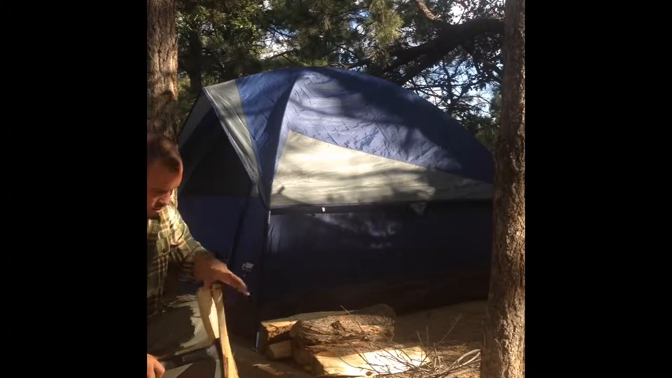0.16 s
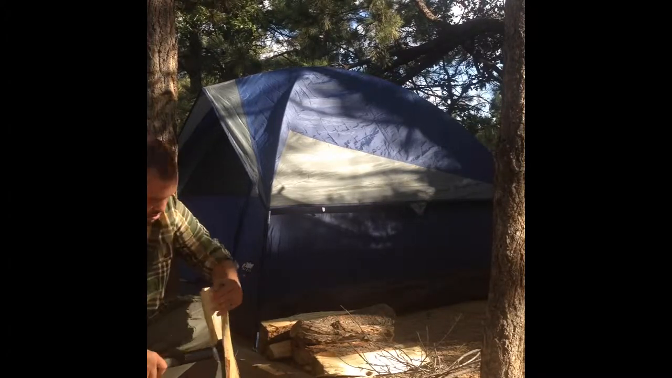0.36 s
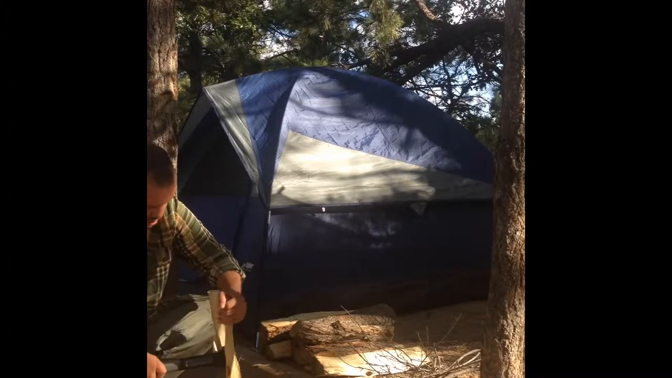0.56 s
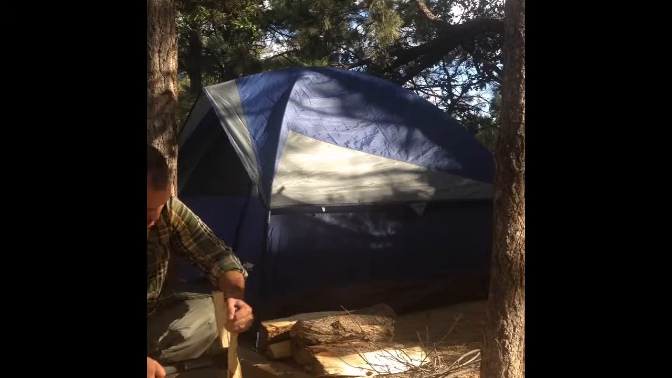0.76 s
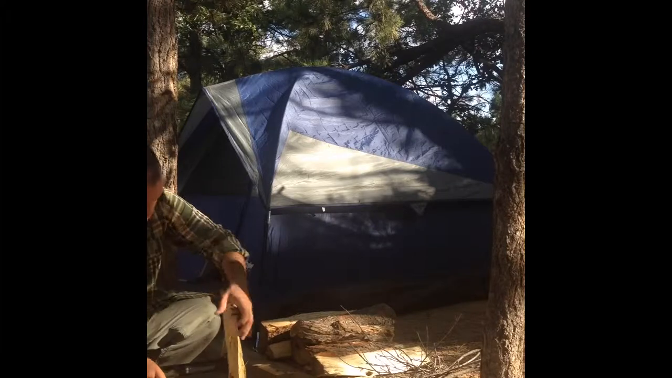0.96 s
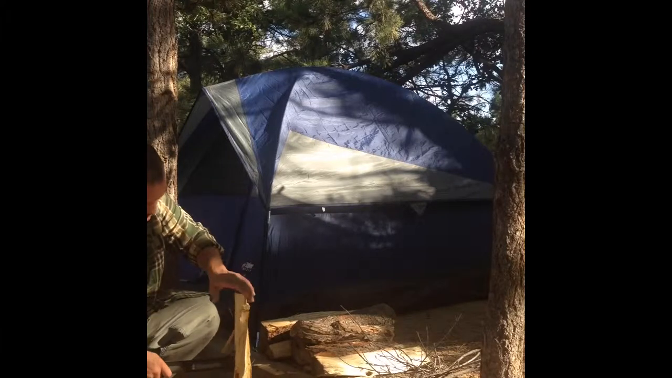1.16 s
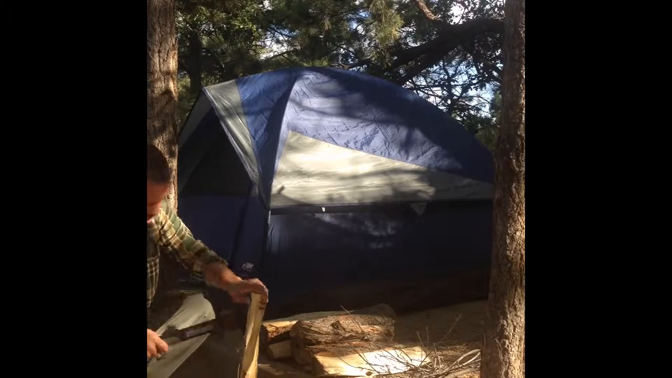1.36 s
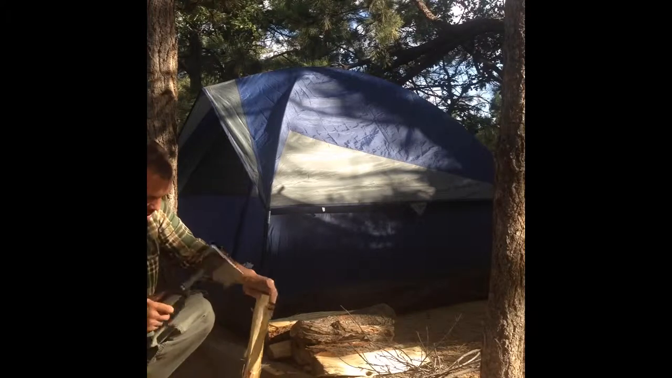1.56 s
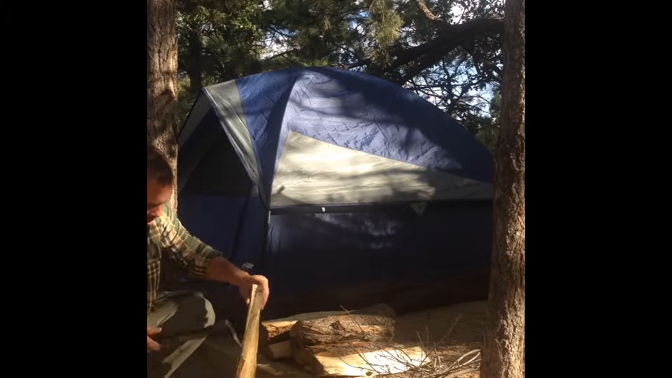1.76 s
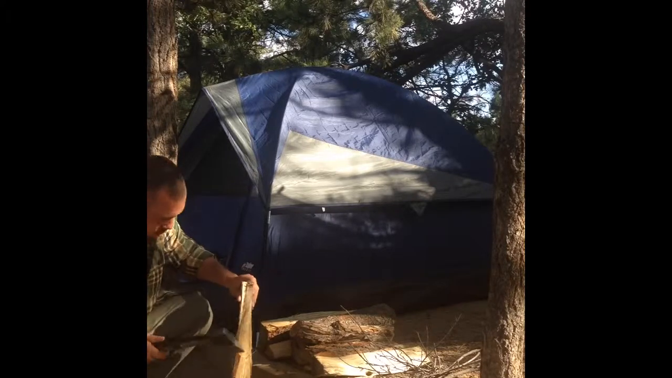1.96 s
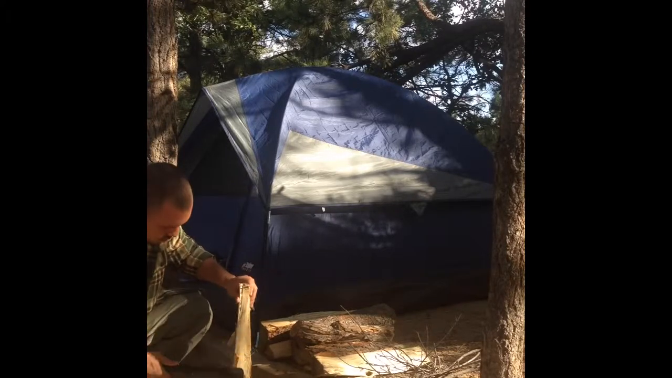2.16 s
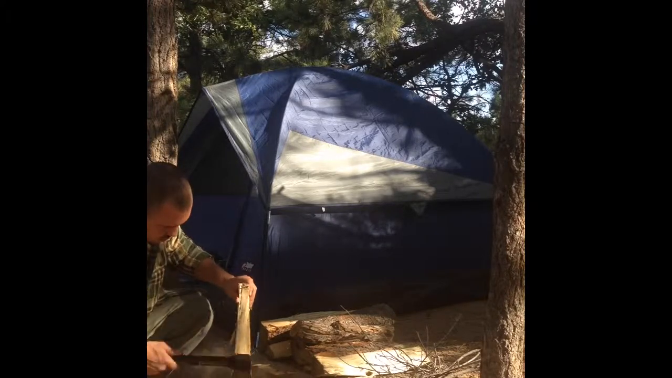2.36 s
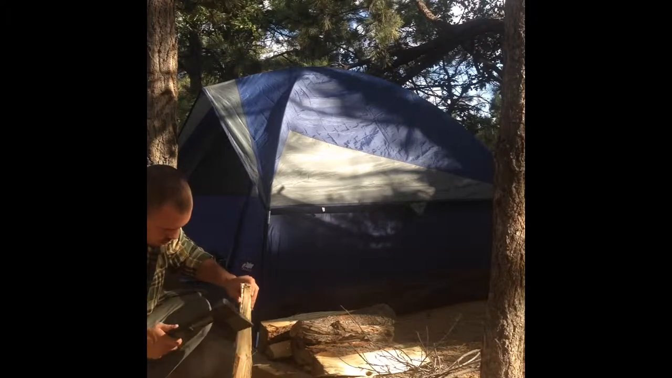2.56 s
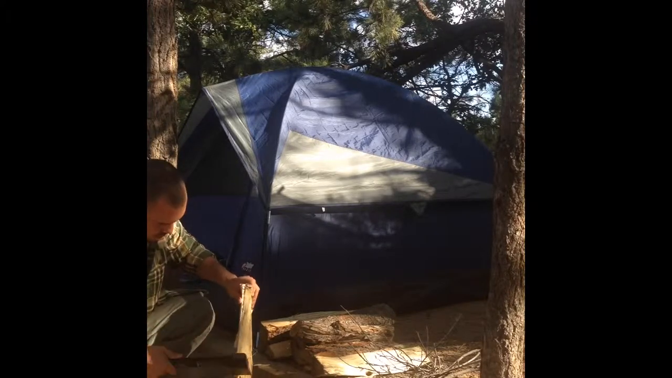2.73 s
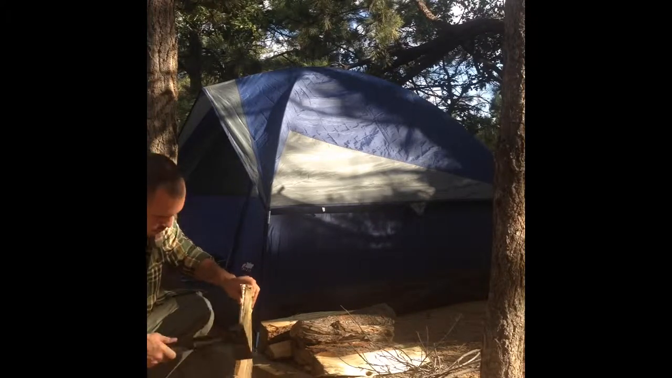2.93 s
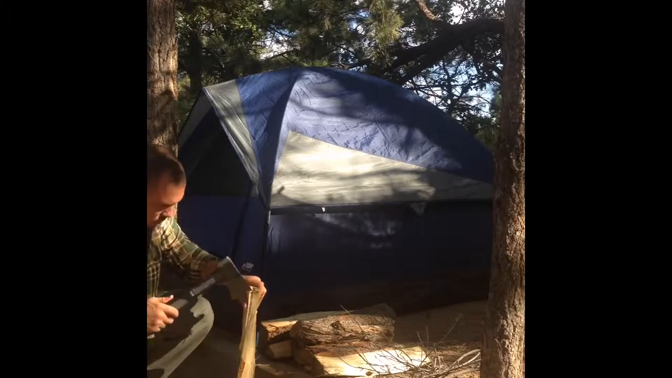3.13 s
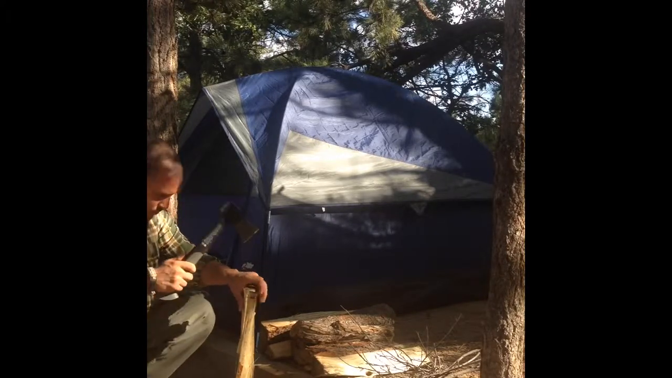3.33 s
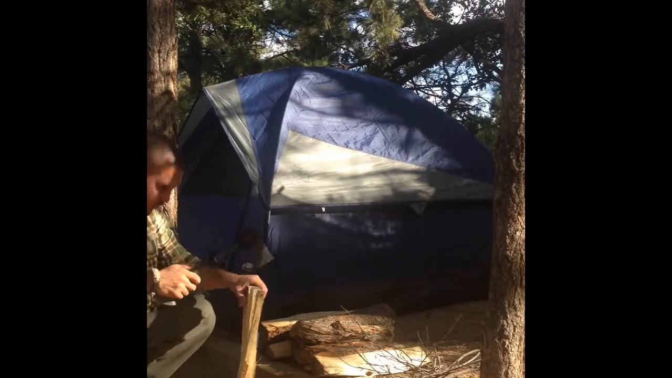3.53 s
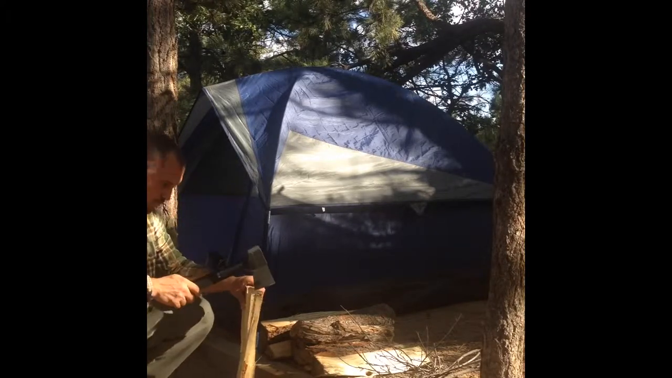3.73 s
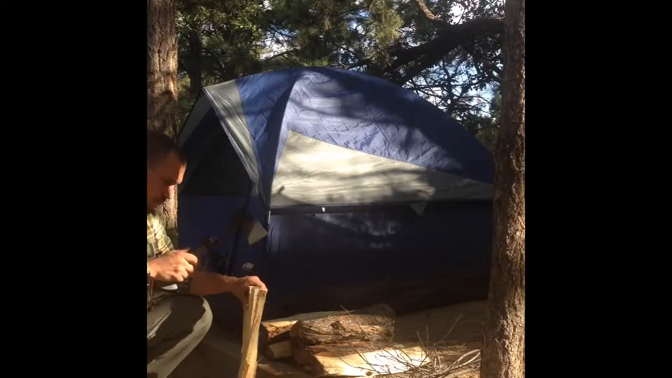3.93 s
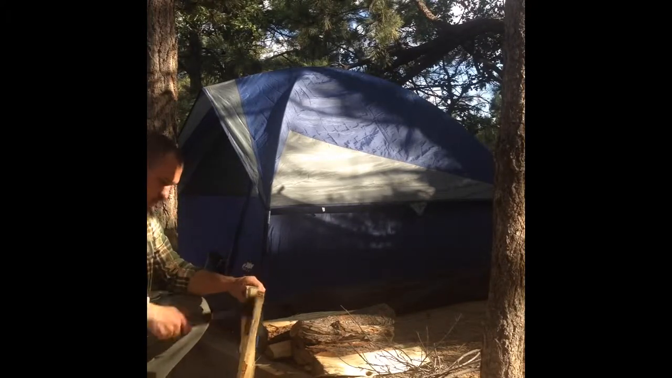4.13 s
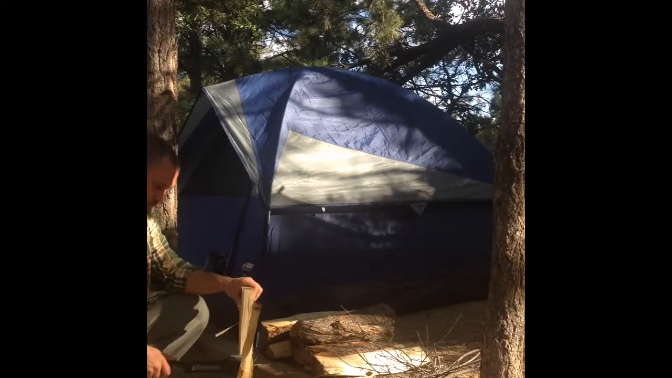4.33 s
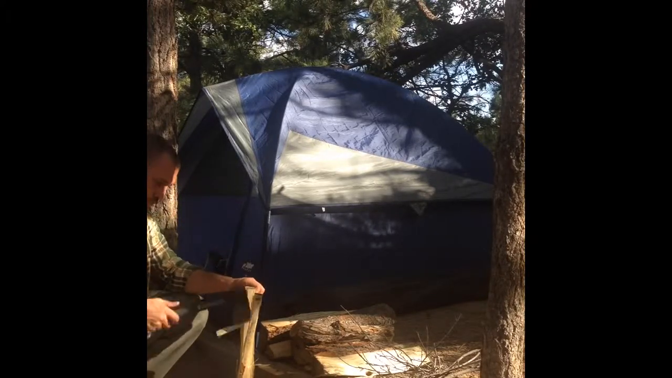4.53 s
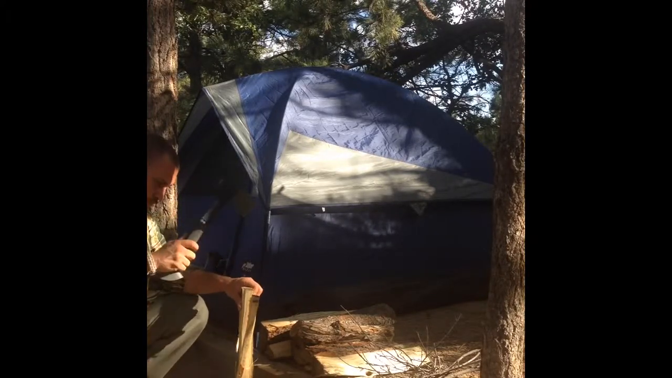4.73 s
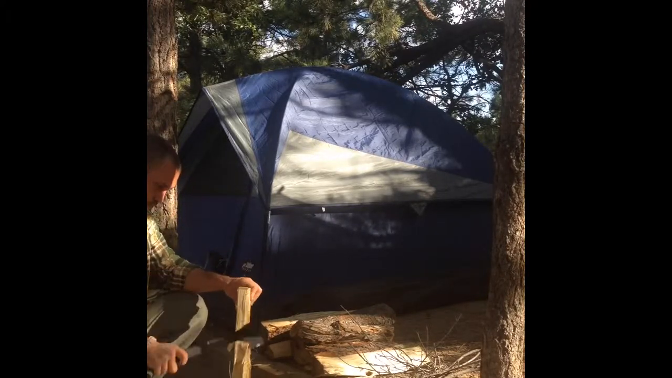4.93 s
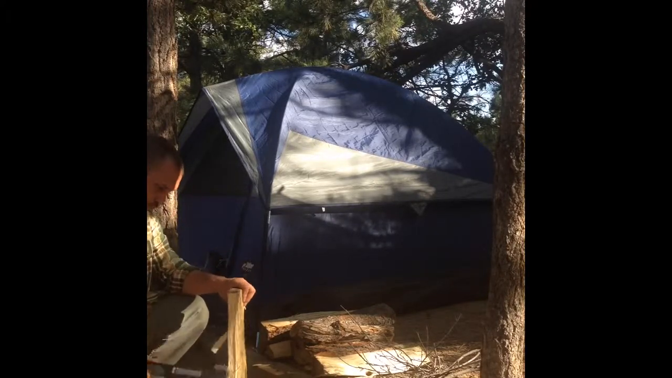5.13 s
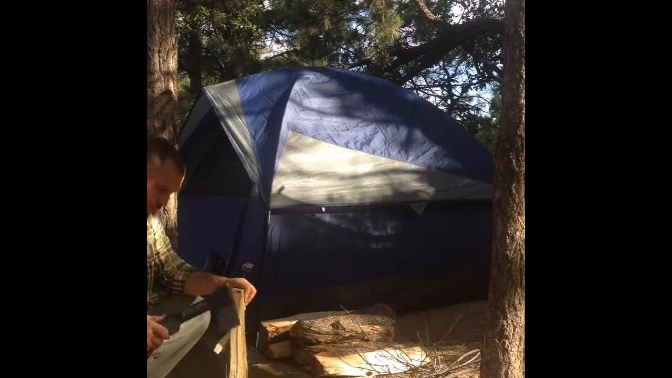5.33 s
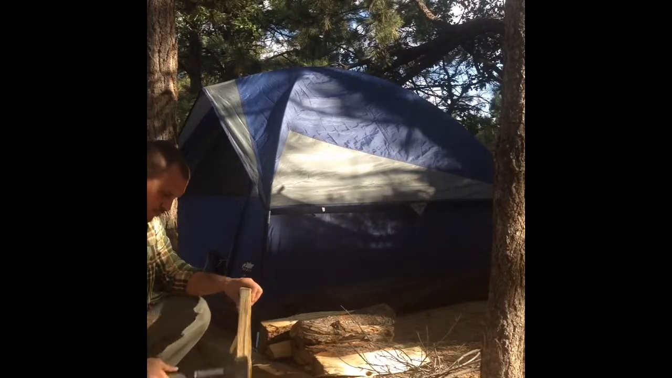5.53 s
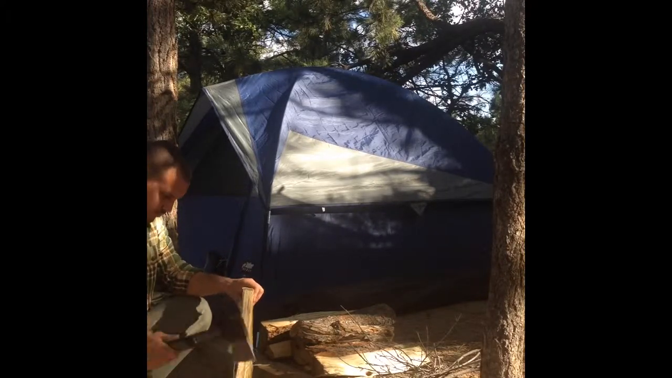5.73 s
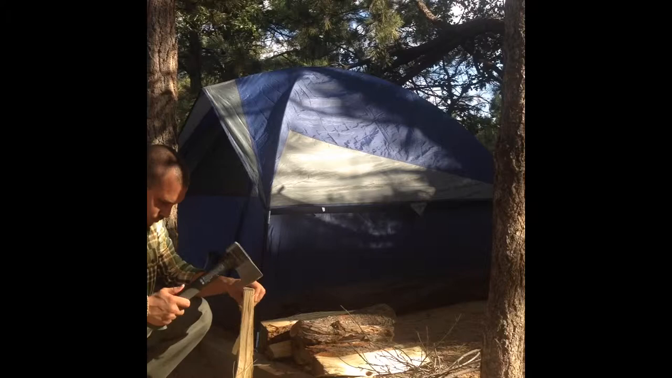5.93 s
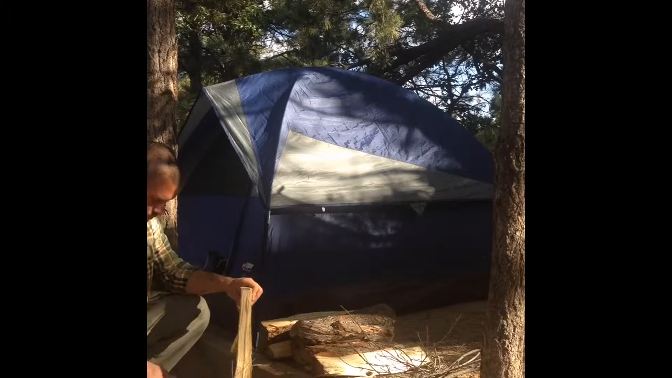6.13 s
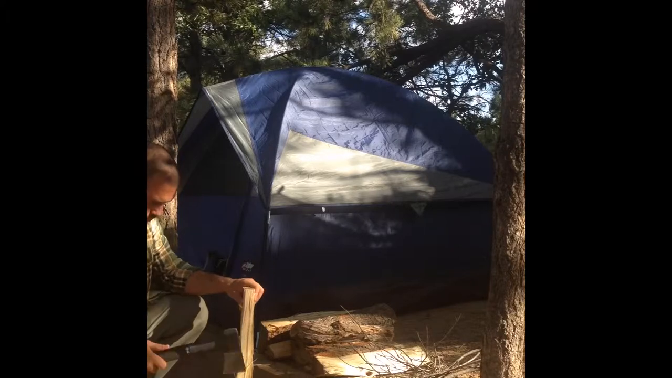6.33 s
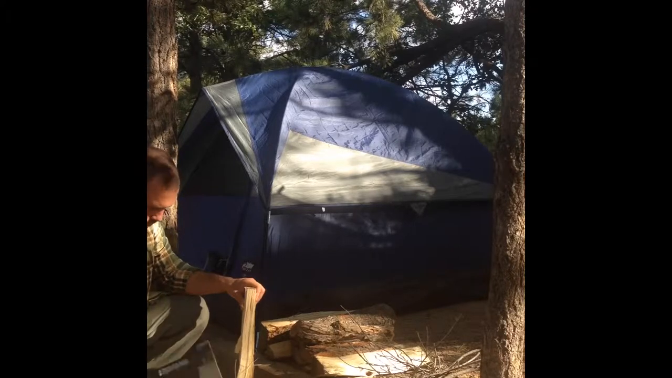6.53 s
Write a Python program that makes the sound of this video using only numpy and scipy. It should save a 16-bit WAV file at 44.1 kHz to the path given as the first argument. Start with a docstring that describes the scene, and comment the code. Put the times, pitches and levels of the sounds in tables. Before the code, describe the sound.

Quiet handling ticks come first, then two loud chops close together, a pause, and further splitting blows of varied strength. Each is a bright fibrous snap with a short hollow knock and ground thump, some trailed by crackling. Far traffic, faint motor hum and low wind sit well below. Close mono pickup in an open wooded camp, slightly overloaded on the hardest crack.

```python
"""Chopping firewood in a forest camp

A hatchet thuds into a stick of firewood: short noise bursts ring the dry fibres as snaps, ticks and
crackle, and decaying sines are the stick hitting the ground. Fading noise is the wash from the trees.
Shaped noise makes the far road, the hiss and a gust. Stacks of gliding sines make two engines revving
past, and sines of fixed pitch make the hum of a generator."""
import sys
import numpy as np
from scipy import signal
from scipy.io import wavfile
from scipy.ndimage import uniform_filter1d

SR = 44100
rng = np.random.default_rng(int(sys.argv[2]) if len(sys.argv) > 2 else 0)


def how_loud(loudness_db):
    """Turn decibels into a plain amplitude multiplier (0 dB gives 1, 20 dB gives 10)."""
    steps = np.asarray(loudness_db, float) / 20
    return 10 ** steps


def dump(signal):
    """Clip the signal to [-1, 1] and save it as 16-bit WAV at the path in sys.argv[1]."""
    limited = np.clip(np.atleast_2d(signal).T, -1, 1)
    pcm = np.round(limited * 32767).astype(np.int16)
    wavfile.write(sys.argv[1], SR, pcm)


N = 295024  # length in samples


def add(mix, start_s, sound):
    """Mixes a sound in at a time, cutting it off at the end of the mix."""
    part = mix[round(start_s * SR):][:len(sound)]
    part += sound[:len(part)]


def read(points, hz):
    """Reads a table between its points, along a log-frequency axis."""
    f, value = np.transpose(points)
    return np.interp(np.log(hz + 1), np.log(f + 1), value)


def peaked(x):
    """Scales to a peak of one."""
    return x / np.max(np.abs(x))


# far road and microphone hiss, relative spectrum: (f/Hz, level/dB per Hz)
ROAD_SPECTRUM = [(15, -47), (28, -31.5), (40, -16), (55, 1.5), (97, 2), (157, -2.5), (250, -6), (344, -9),
                 (463, -11.5), (700, -7), (961, -8), (1400, -13), (1900, -23), (2540, -28), (3400, -27),
                 (5000, -29.5), (14700, -31.5), (16000, -39.5)]
# a gust on the microphone in the deep bass: (loudest t/s, half length t/s, calm level/dB, added gust level/dB)
GUST = (5.5, 1.2, -2.5, 8)


def road(patchy_db=1.0, lumpy_db=1.5):
    """Noise built from random short-time spectra in drifting patches; the bass is lumpier than the hiss."""
    rms_db, traffic_lift_db = -50.5, 1.65
    size, hop = 2048, 512
    frames, hz = N // hop + 5, np.fft.rfftfreq(size, 1 / SR)
    real, imaginary, patches = rng.standard_normal((frames, len(hz), 3)).T
    patches = uniform_filter1d(patches, size=9, axis=0)
    patches = uniform_filter1d(patches, size=9, axis=1)
    depth_db = np.where(hz < 300, lumpy_db, patchy_db * (hz < 5000))[:, None]
    patch_db = depth_db * patches / patches.std()

    loudest_s, half_s, calm_db, gust_db = GUST
    t = np.arange(frames) * hop / SR
    breeze_db = calm_db + gust_db / (1 + ((t - loudest_s) / half_s) ** 2)
    deep_bass = np.clip(2 - hz / 60, 0, 1)[:, None]  # full up to 60 Hz, none above 120 Hz
    swell_db = traffic_lift_db * (hz < 5000)[:, None] + breeze_db * deep_bass

    spectra = (real + 1j * imaginary) * how_loud(read(ROAD_SPECTRUM, hz)[:, None] + patch_db + swell_db)
    wash = signal.istft(spectra, nperseg=size, noverlap=size - hop)[1][:N]
    return how_loud(rms_db) * wash / wash.std()


def engine(hz, orders, levels_db, waver_db):
    """Sines on multiples of a turning speed, wavering in level and phase as the air carries them."""
    t, turns = np.arange(N) / SR, np.cumsum(hz) / SR
    air = rng.standard_normal((N // 1024 + 2, len(orders)))
    air = uniform_filter1d(air, size=5, axis=0).T
    out = np.zeros(N)
    for order, level_db, drift in zip(orders, levels_db, air):
        drift = np.interp(t, np.arange(len(drift)) * 1024 / SR, drift / drift.std())
        phase = 2 * np.pi * (order * turns + rng.random()) + 0.25 * drift
        out += how_loud(level_db + waver_db * drift) * np.sin(phase)
    return np.sqrt(2) * out  # makes the levels rms


def passing(rows):
    """Speed and level along a pass; beyond its ends the engine fades by 300 dB per second."""
    s, hz, db = np.transpose(rows)
    t = np.arange(N) / SR
    outside_s = np.maximum(0, np.maximum(s[0] - t, t - s[-1]))
    return np.interp(t, s, hz), np.interp(t, s, db) - 300 * outside_s


# each hum order swells once and fades, a row per order:
# (loudest t/s, level/dB, fade/dB per s to either side)
HUM_SWELLS = [(5.6, -55, 6.5), (6.95, -55.5, 2), (3, -62, 2.3), (6.7, -62.5, 1.5), (3.9, -60, 7),
              (0.19, -64.5, 3), (7.2, -65, 1.5)]
# which multiples of the shaft speed are heard
HUM_MULTIPLES = (2, 4, 5, 6, 7, 8, 12)


def generator_hum():
    """A shaft turning at one speed hums on its multiples, each rising and falling in level."""
    shaft_hz, t = 46.45, np.arange(N) / SR
    levels_db = [top_db - fade_db * abs(t - s) for s, top_db, fade_db in HUM_SWELLS]
    return engine(np.full(N, shaft_hz), HUM_MULTIPLES, levels_db, waver_db=0.85)


# a second engine, one order heard above the road: (t/s, f/Hz, level/dB)
DRONE_PASS = [(4.35, 167, -58), (4.5, 155.6, -63), (4.7, 156.4, -56), (5, 170, -55.5), (5.38, 171, -58.5),
              (5.55, 161, -56.5), (5.75, 154, -67)]


def passing_drone():
    """One wavering sine follows the speed of the second engine."""
    hz, db = passing(DRONE_PASS)
    return engine(hz, [1], [db], waver_db=3.0)


# an engine revs and drops: (t/s, firing f/Hz, level/dB before the exhaust pipe)
REV_PASS = [(0.0, 80.5, -63), (0.3, 76.33, -62), (0.42, 76.03, -50.5), (0.56, 82.84, -46), (0.7, 86.2, -46),
            (0.82, 87.1, -46.5), (1.01, 86.3, -44), (1.21, 78, -49), (1.4, 70.06, -49.5),
            (1.63, 65.6, -47.5), (1.74, 61.35, -49), (1.99, 56.4, -56), (2.15, 57.56, -70)]
# the exhaust pipe colours each order as it glides through: (f/Hz, level/dB)
EXHAUST_PIPE = [(55, -6.5), (85, -7.5), (125, -3), (150, -2), (182, 0), (205, -12), (250, -19), (350, -24)]


def revving_engine():
    """The firing note and its next three multiples glide together through the exhaust pipe's response."""
    hz, db = passing(REV_PASS)
    orders = range(1, 5)
    levels_db = [db + read(EXHAUST_PIPE, order * hz) for order in orders]
    return engine(hz, orders, levels_db, waver_db=0.94)


# how fast the wash from the trees dies: (f/Hz, time to fall 60 dB t/s)
TREE_DECAY = [(250, 0.16), (700, 0.1), (1800, 0.1), (4500, 0.085), (7000, 0.096), (11000, 0.076)]


def trees(wood):
    """Scattered echoes from trunks and tent: noise whose bands each die at their own speed."""
    wash_db = -14
    far_t60_s, far_db = 0.59, -28.5  # the far edge of the clearing answers longer, below 6 kHz
    hz, t, spectra = signal.stft(rng.standard_normal(SR // 2), SR, nperseg=128)
    near = how_loud(-60 * t / read(TREE_DECAY, hz)[:, None])
    far = how_loud(far_db - 60 * t / far_t60_s) * (hz < 6000)[:, None]
    tail = signal.istft(spectra * (near + far), SR, nperseg=128)[1]
    # soft start: the nearest trunk is a metre or two away
    tail *= 1 - np.exp(-(np.arange(len(tail)) / SR / 0.0013) ** 2)
    return how_loud(wash_db) * signal.fftconvolve(wood, tail / np.linalg.norm(tail))[:N]


def mode(x, hz, width_hz):
    """A two-pole resonance of gain one at its centre."""
    radius = np.exp(-np.pi * width_hz / SR)
    angle = 2 * np.pi * min(hz, SR / 2.2) / SR
    return signal.lfilter([1 - radius, 0, radius - 1], [1, -2 * radius * np.cos(angle), radius ** 2], x)


# dry fibres ring with, before pitch and brightness: (f/Hz, width of one pass f/Hz, level/dB)
FIBRE_MODES = [(1191, 600, 0.5), (2136, 1200, 0.5), (2740, 1500, 7.5), (3280, 2600, -1.5), (4398, 1400, -1),
               (5700, 1680, -17.5), (7140, 2170, -20.5), (9400, 3000, -48.5), (12400, 2840, -50)]


def ring(breaks, pitch, bright_db, envelope=1):
    """The dry wood: every resonance applied twice for dark valleys; treble dies out of a burst first."""
    out = 0
    for k, (hz, width_hz, db) in enumerate(FIBRE_MODES):
        drive = breaks * envelope ** ((hz / 2750) ** 0.41)
        level_db = db + bright_db * np.log2(hz / 2750)  # brightness is in dB per octave
        once = mode(drive, hz * pitch, width_hz)
        out = out + (-1) ** k * how_loud(level_db) * mode(once, hz * pitch, width_hz)
    return out


# bark and splinters crackle in bursts:
# (loudest t/s, rms level/dB, rise/ms per 10 dB (at least 1 is used), fall/ms per 10 dB)
CRACKLE_BURSTS = [(0.649, -69, 60, 58), (0.84, -65.5, 30, 62), (0.93, -74, 50, 300), (1.75, -76, 198, 123),
                  (2.229, -61, 21, 147.5), (2.766, -56, 16.5, 46.5), (3.735, -67.5, 27, 42),
                  (4.234, -47.5, -2, 33), (4.266, -42.5, 14, 19), (4.55, -76, 93, 112),
                  (5.008, -42, 17.5, 65), (5.656, -39.5, 11, 28), (6.175, -53, 25, 70)]


def crackle(per_s=2500, spread_db=6.0):
    """Dense random breaks of uneven size ring the fibres, swelling and fading in bursts."""
    when, size, sign = rng.random((N, 3)).T
    sizes = how_loud(-spread_db * np.log(size + 0.01885))
    breaks = (when < per_s / SR) * sizes * np.sign(sign - .5)
    sound = ring(breaks, pitch=1.03, bright_db=4.5)
    ms = np.arange(N) / SR * 1000
    level = how_loud(-75)  # the dry litter never quite rests
    for s, db, rise_ms, fall_ms in CRACKLE_BURSTS:
        before = (s * 1000 - ms) / max(rise_ms, 1)
        after = (ms - s * 1000) / max(fall_ms, 1)
        level = level + how_loud(db - 10 * np.maximum(before, after))
    return level * sound / sound.std()


def snap(db, pitch, tear_ms, bright_db):
    """A burst of small breaks builds to one clean break and dies away."""
    chance = rng.standard_normal(2048)
    ms = np.arange(len(chance)) / SR * 1000
    breaks = chance * (1 - np.exp(-ms / .5))
    breaks[round(.0006 * SR)] = 3.5  # the clean break
    return how_loud(db) * peaked(ring(breaks, pitch, bright_db, np.exp(-ms / tear_ms)))


# bark and chips tick as the stick is handled:
# (t/s, peak level/dB, pitch factor on the wood, brightness/dB per octave)
HANDLING_TICKS = [(0.6643, -39.5, 0.69, 6), (0.8408, -51, 0.8, 3), (0.888, -45.5, 1.06, 12),
                  (0.9507, -44.5, 1.5, -6), (1.005, -43.5, 1.16, 5), (1.0682, -45.5, 0.89, 7),
                  (1.1113, -47, 1.77, -6), (1.139, -51, 1, 2), (1.3354, -48, 0.93, 6),
                  (1.734, -48, 0.96, -1), (1.785, -50, 1.03, 3), (2.6525, -47, 1, -2),
                  (3.7213, -41, 1.8, -11), (3.7233, -35, 0.96, 2), (4.2245, -45, 1.4, -2.5),
                  (4.4468, -49, 0.79, 6), (4.5293, -45, 1.04, -3), (5.1353, -41.5, 0.85, 6),
                  (5.2427, -41.5, 0.89, -0.5), (5.6193, -37.5, 1.14, -2), (5.695, -32.5, 1.13, 0),
                  (6.0698, -51, 1.95, 1), (6.1334, -44.5, 0.75, 9), (6.232, -49, 1.8, 2),
                  (6.256, -42.5, 1.21, 8), (6.295, -34, 0.81, 4), (6.4033, -42, 1.06, 6),
                  (6.5767, -47.5, 0.82, 2)]


def handling_ticks():
    """Faint snaps of the same dry wood, all with one tearing time."""
    out = np.zeros(N)
    for s, db, pitch, bright_db in HANDLING_TICKS:
        add(out, s, snap(db, pitch, 2.9, bright_db))
    return out


def thud(db, pitch, upper_db, ring_time, contact_ms=3.08):
    """A soft push rings the ground and the bending modes of the stick; high modes answer sooner."""
    t = np.arange(round(.2 * SR)) / SR
    out = np.zeros(len(t))
    for hz, t60, mode_db in STICK_MODES:
        share_db = 0
        if hz < 200:  # the ground thump grows as a blunter blow rings the upper modes less
            share_db = -15 - 0.2 * upper_db
        elif hz > 400:
            share_db = upper_db
        rise = 1 - np.exp(-(t * 1000 / contact_ms * hz / 320) ** 2)
        decay = how_loud(mode_db + share_db - 60 * t / t60 / ring_time)
        out -= decay * rise * np.sin(2 * np.pi * hz * pitch * t)
    return how_loud(db) * peaked(out)


# the whole stick rings with, before each blow's factors: (f/Hz, time to fall 60 dB t/s, level/dB)
STICK_MODES = [(116, 0.12, 0.8), (323, 0.038, 6), (430, 0.04, -10.5), (547, .035, 2.4),
               (893.4, 0.018, -2.5)]
# the stick is driven onto the ground:
# (t/s, peak level/dB, pitch factor, upper modes level/dB, ring-time factor)
STICK_THUDS = [(0.7, -34.5, 0.56, -26, 3.9), (2.2295, -13, 0.95, -12, 0.99), (2.246, -25, 1.09, -0.5, 0.63),
               (2.768, -7, 0.91, -2, 0.48), (3.722, -39, 1.34, 1, 0.73), (4.2682, -13, 1.03, -1, 0.9),
               (4.2751, -21, 1.4, -7, 0.29), (4.9821, -32, 0.94, -1, 1.3), (4.993, -16, 1.3, -10, 0.23),
               (5.104, -34, 1.18, -8, 0.44), (5.245, -42, 1, 4, 0.66), (5.639, -20.5, 1.075, 3, 2),
               (5.67, -19, 1.12, 9, 0.37), (5.674, -22, 0.96, -10, 1.5), (6.1592, -23, 0.91, 0, 0.63),
               (6.1624, -8, 1.024, 6.5, 0.62), (6.1735, -33, 1.3, 19, 0.74), (6.2938, -29, 0.9, -5, 0.38)]


def stick_thuds():
    """Each blow sets the ground and the stick ringing anew."""
    out = np.zeros(N)
    for s, *blow in STICK_THUDS:
        add(out, s, thud(*blow))
    return out


# the blade bites or fibres snap: (t/s, peak level/dB, pitch factor on the wood,
# time constant of the tearing at 2750 Hz/ms, brightness/dB per octave)
BLADE_SNAPS = [(2.2312, -11, 1, 4, 0), (2.246, 1, 0.86, 1.67, 7.5), (2.7678, -2.5, 1, 3.5, -1.5),
               (2.7779, -2, 1.19, 1.7, 3), (4.2325, -30.5, 0.98, 9.3, -6), (4.2455, -25.5, 0.75, 4.7, 10),
               (4.2525, -26.5, 0.91, 2.8, 1), (4.263, -34, 0.9, 4.5, 0.6), (4.269, -6, 1.05, 3.3, -0.5),
               (4.274, -25, 0.79, 1.4, -13), (4.9808, -12.5, 0.84, 4.8, 1), (4.993, -2.5, 1.21, 1.7, -2),
               (4.9971, -9, 0.88, 1.8, 1.5), (5.0195, -24, 1.2, 0.61, 12), (5.0245, -10, 1.1, 2.45, 6),
               (5.0365, -25, 1.35, 0.77, 1), (5.045, -24.5, 0.97, 2.4, 5), (5.092, -28.5, 0.99, 3.7, 3),
               (5.6385, -18.5, 1.63, 1.6, -6.5), (5.6388, -15.5, 0.47, 1.8, 2), (5.66, -25, 1.4, 3.2, -19),
               (5.664, -24.5, 1.5, 2.8, 4), (5.67, -12, 0.82, 3, 8), (5.674, -22, 0.42, 0.75, 6),
               (6.1611, -8.5, 0.89, 3.7, 2), (6.1641, -7.5, 1.35, 3.9, -5), (6.173, -14.5, 1.28, 1.6, 0)]


def blade_snaps():
    """The blade and the splitting fibres set off short bursts of breaks in the wood."""
    out = np.zeros(N)
    for s, *bite in BLADE_SNAPS:
        add(out, s, snap(*bite))
    return out


def scene():
    """Chopping among trees over the far traffic; only the wood sounds get the wash of echoes."""
    motors = generator_hum() + passing_drone() + revving_engine()
    wood = crackle() + handling_ticks() + stick_thuds() + blade_snaps()
    return (road() + motors + trees(wood) + wood)[None]


def low_pass(x):
    """Removes everything above the highest recorded frequency."""
    return signal.sosfilt(signal.butter(12, 16120, fs=SR, output="sos"), x)


def record(dry):
    """The small microphone loses the deepest bass and overloads softly on the hardest cracks."""
    bass_hz, ceiling = 47.7, 1.15
    high_pass = signal.butter(2, bass_hz, "high", fs=SR, output="sos")
    heard = signal.sosfilt(high_pass, dry)
    mix = ceiling * np.tanh(heard / ceiling)
    return low_pass(mix)


dry = scene()
out = record(dry)
dump(out)
```